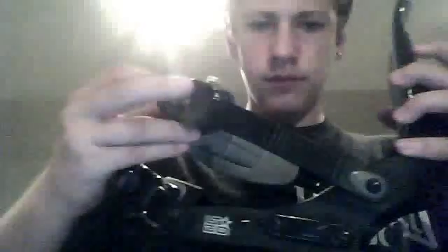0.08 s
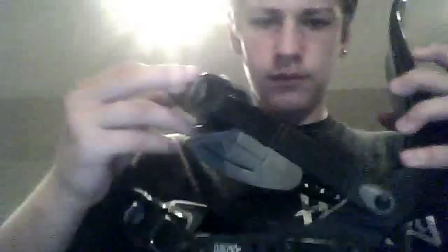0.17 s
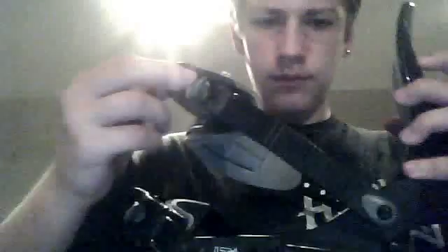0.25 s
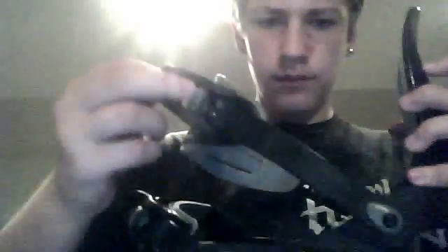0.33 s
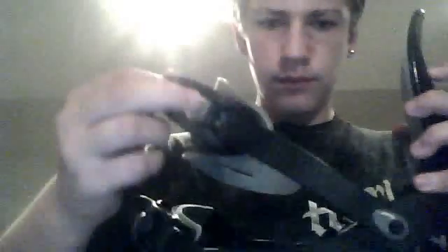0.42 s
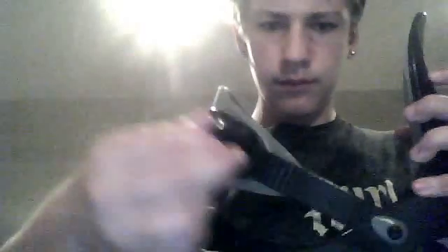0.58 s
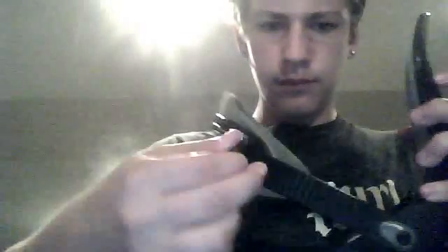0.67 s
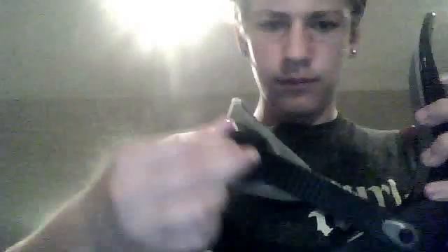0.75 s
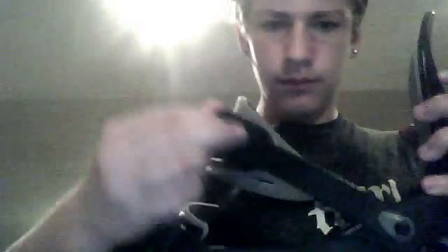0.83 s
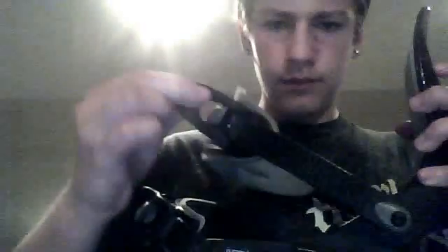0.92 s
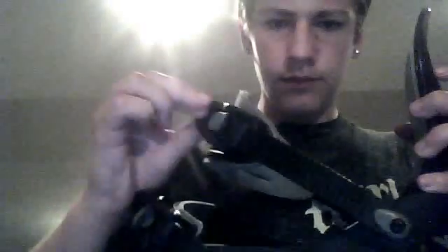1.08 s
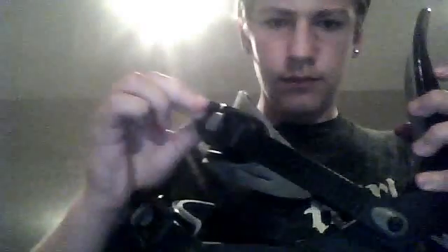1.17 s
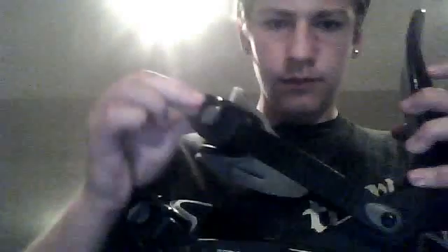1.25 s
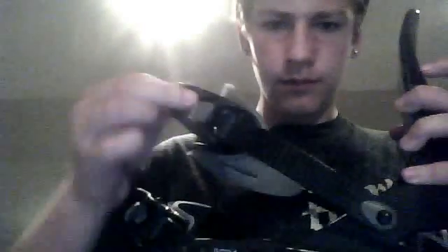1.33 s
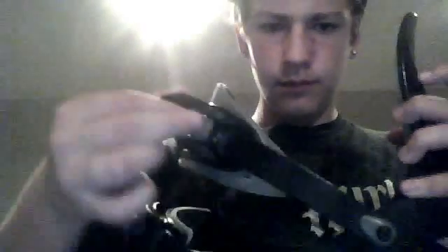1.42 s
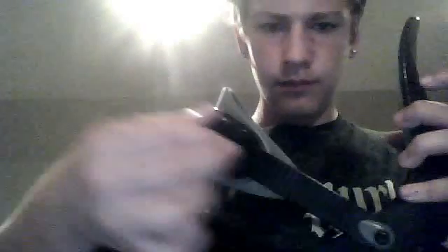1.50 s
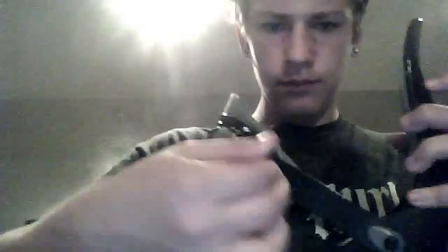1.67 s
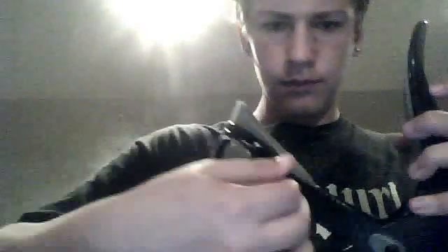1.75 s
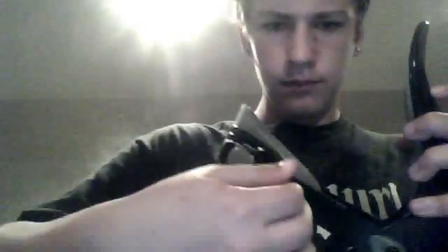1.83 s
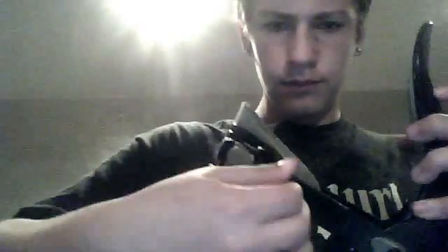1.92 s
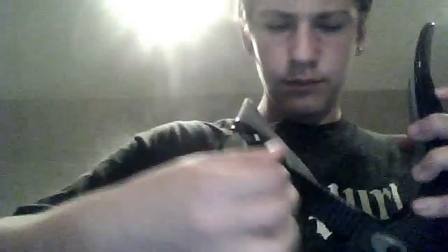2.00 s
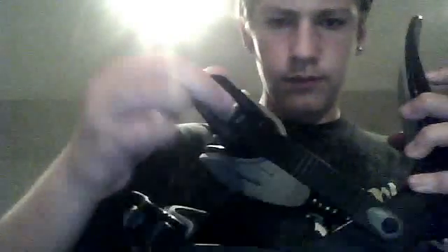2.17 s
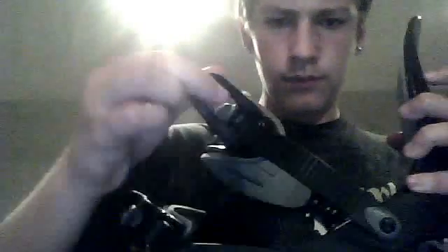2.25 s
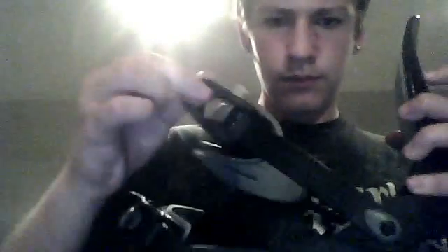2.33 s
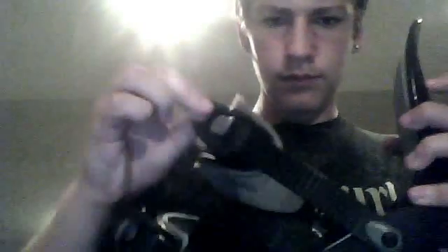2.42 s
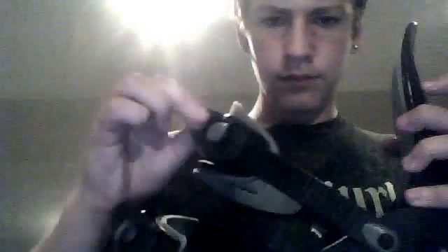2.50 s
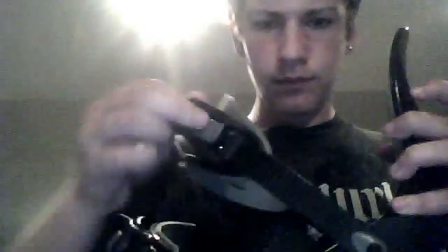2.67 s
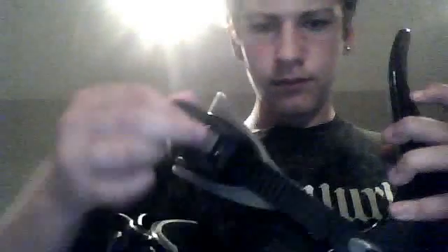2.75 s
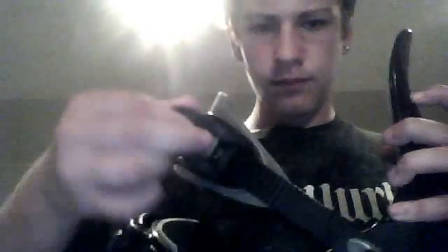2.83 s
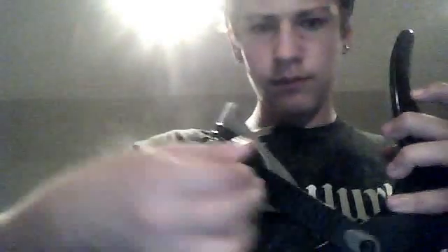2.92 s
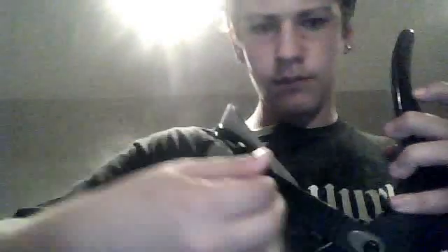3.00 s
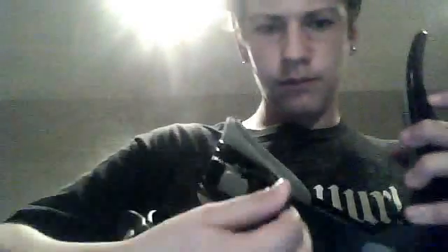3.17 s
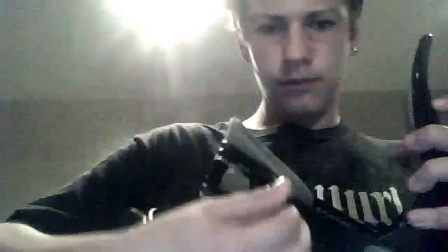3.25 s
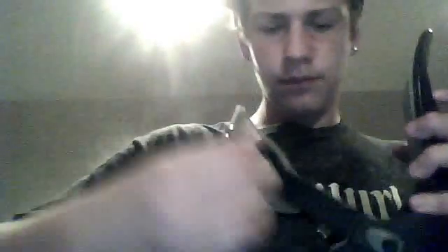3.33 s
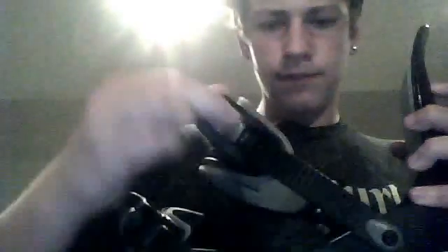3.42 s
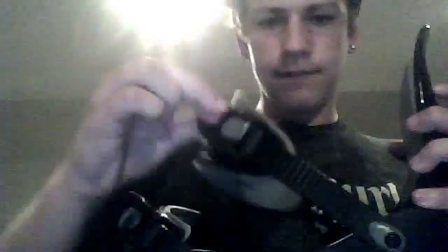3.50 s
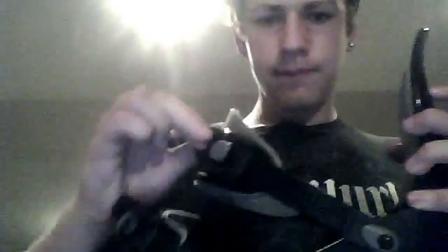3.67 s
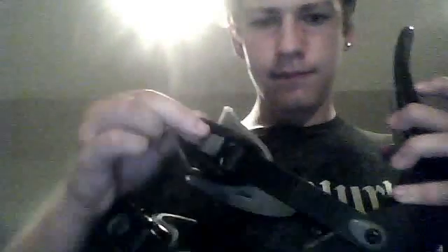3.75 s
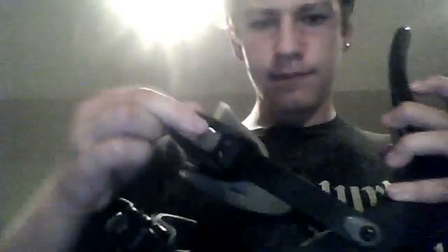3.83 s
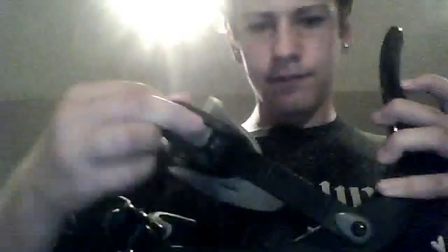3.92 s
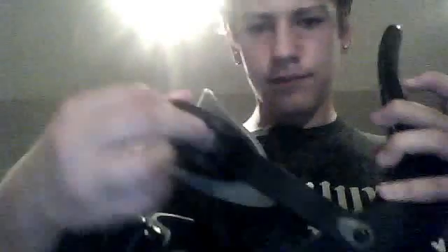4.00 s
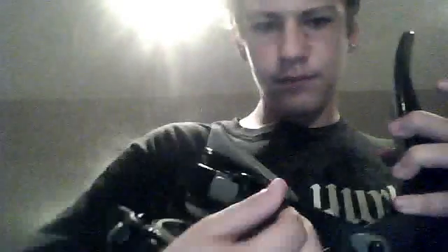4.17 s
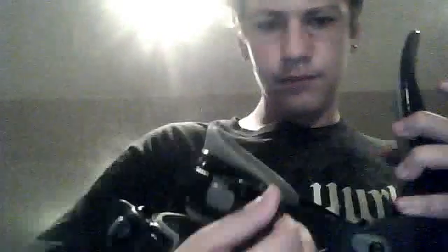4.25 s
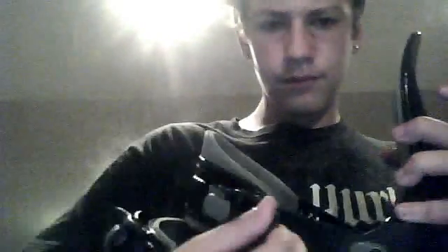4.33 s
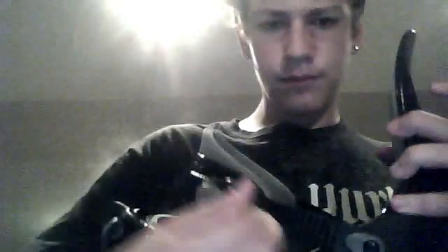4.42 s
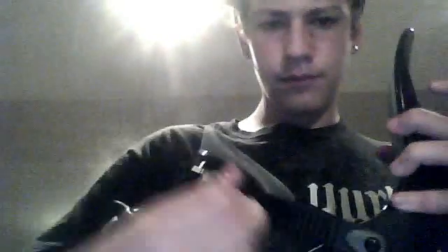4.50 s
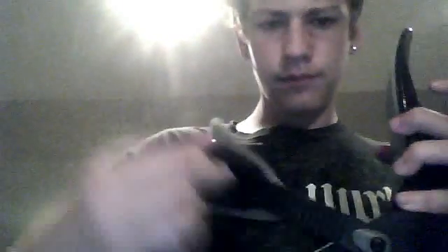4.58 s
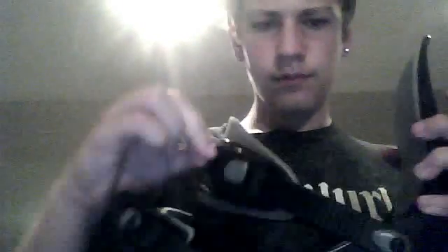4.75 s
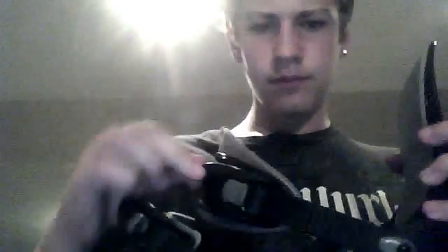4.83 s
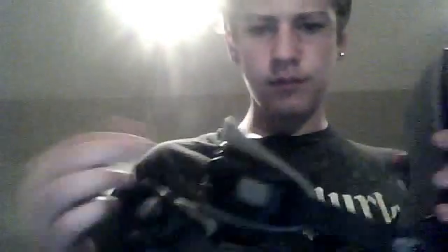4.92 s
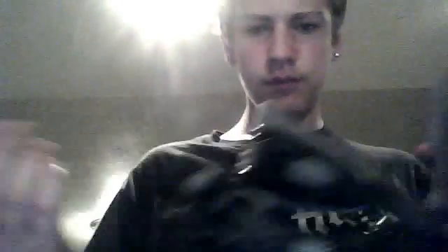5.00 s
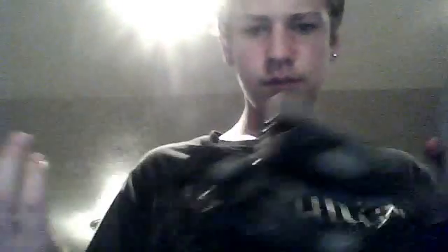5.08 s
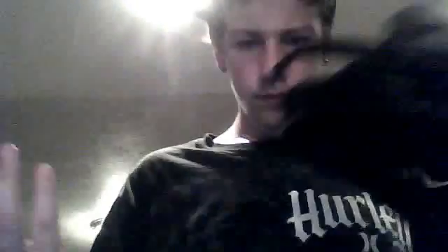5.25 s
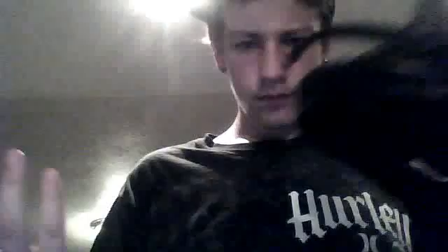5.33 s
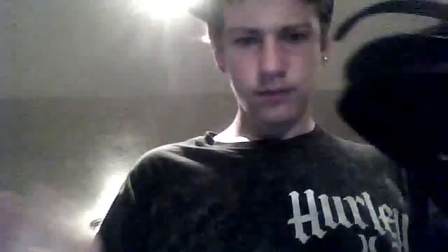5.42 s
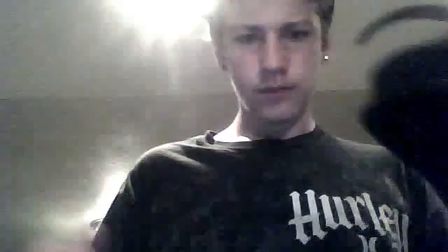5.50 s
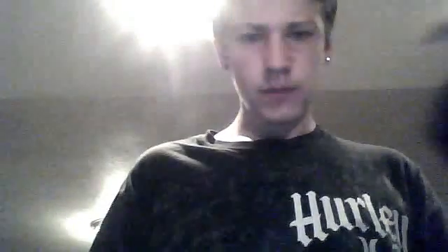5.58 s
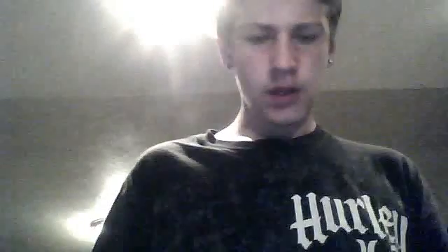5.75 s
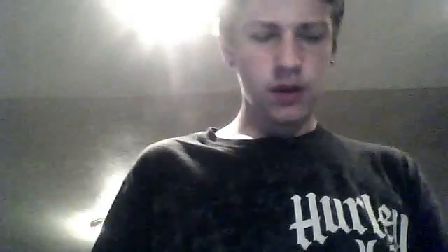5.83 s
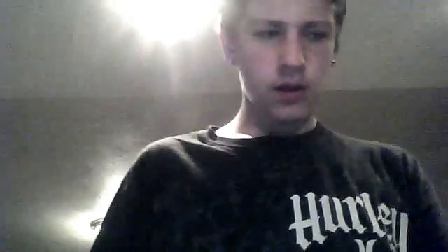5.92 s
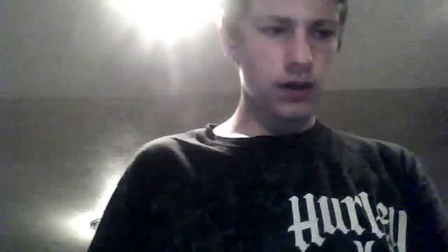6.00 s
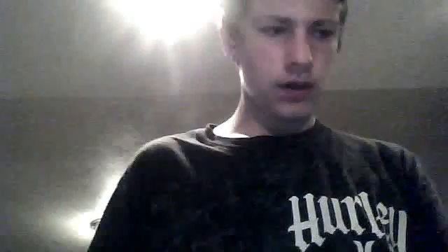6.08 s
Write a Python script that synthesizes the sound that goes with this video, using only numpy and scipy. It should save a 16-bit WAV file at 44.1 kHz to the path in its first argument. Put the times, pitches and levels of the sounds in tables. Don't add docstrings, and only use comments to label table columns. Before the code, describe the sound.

Over constant low motor hum and soft fan hiss, sharp plastic clicks snap in quick pairs, the first the loudest, then a duller single click, more pairs, and small rattling knocks as a lever lands on its stop. Faint ticks fill the gaps. Everything is close, dry and slightly grainy, with dulled treble and a short small-room tail; a muffled thump comes last.

```python
import sys
import numpy as np
from scipy import signal
from scipy.fft import rfft, irfft, next_fast_len
from scipy.io import wavfile
from scipy.ndimage import uniform_filter1d, map_coordinates

SR = 44100
rng = np.random.default_rng(int(sys.argv[2]) if len(sys.argv) > 2 else 0)


def persist_wave(psi):
    counts = np.round(np.clip(psi, -1, 1) * 32767).astype(np.int16)
    wavfile.write(sys.argv[1], SR, np.atleast_2d(counts).T)


def volts(x):
    e = np.asarray(x, float) / 20
    return 10 ** e


N = 271788

# start in seconds, ping peak in
# dB, ping in Hz, shell ring in dB over the ping, bright crack in dB over the ping.
SNAPS = [
    (0.6284, -9.5, 4000, -15.5, -4),
    (0.6955, -14.5, 4280, -7, 5),
    (1.021, -21.5, 5880, -3.5, -7),
    (1.5733, -12.5, 3950, -9.5, 3),
    (1.631, -13, 3210, -7, 3.5),
    (2.9191, -12, 3130, -8, 2.5),
    (2.9742, -18.5, 3941, 1, -1),
    (4.0985, -13, 3950, -8.5, 3.5),
    (4.1307, -17, 3110, -1, -0.5),
]
# start in seconds, ping peak in dB, ping in Hz.
REBOUNDS = [
    (0.6359, -31, 4360),
    (0.713, -28, 4500),
    (1.03, -22, 4900),
    (2.9895, -28, 5020),
    (4.106, -22, 4140),
]
# shell ring, strap clack, bright crack, each in dB over the ping.
REBOUND_COLOUR_DB = (-25, -18.5, -11)
# start in seconds, ping peak in dB, then shell ring,
# strap clack, bright crack in dB over the ping.
KNOCKS = [(1.0227, -25.5, 12.5, -4, -1), (1.0615, -34, 8, 5, -6), (2.3868, -25.5, 2.5, 2, 1.5),
          (3.4458, -34, 2, 1, -30), (3.5294, -26, -3.5, -4.5, -8), (3.5379, -39, 5, -6, -8),
          (3.551, -47, 11.5, 2, -15), (4.6272, -36.5, 6, 5.5, -15), (4.6785, -19, 1, -2, -0.5),
          (4.6884, -26, -7, -19, -10), (4.7233, -32.5, -8, -1, -10), (4.7263, -35, 0, 3, -1),
          (6.1457, -29.5, -3, -0.5, -27)]
# start in seconds, shell ring in dB.
TICKS = [(1.3337, -40.5), (2.6964, -37.5), (2.7466, -40), (2.8498, -37.5), (3.3634, -39.5), (3.4116, -40),
         (3.8254, -38.5), (3.8875, -37), (4.5868, -37), (4.8434, -39), (4.9488, -38.5), (5.7098, -47)]
# start in seconds, body in Hz, body peak in dB, low thud in dB over the body.
THUDS = [
    (1.0215, 667, -22, -2.5),
    (2.3868, 655, -26, 0.5),
    (3.5308, 690, -25.5, -4),
    (4.6788, 706, -18.5, -37),
    (4.724, 650, -25, -17),
]
# start in seconds, Hz, peak in dB, decay in cycles.
BUMPS = [(.63, 346, -38, 6.1), (.70, 470, -34, 6.9), (1.95, 460, -36, 8.6), (2.03, 450, -39.5, 6.8),
         (4.1, 165.3, -35.5, 2.6), (4.68, 1410, -21.5, 3.5), (4.88, 500, -36.5, 4.5), (6.085, 13, -28, 1.5),
         (6.144, 1450, -26.5, 3.2), (6.154, 340, -30.5, 5.8), (6.159, 64, -18.5, 1.3)]
# centre in Hz, width in Hz, level in dB.
PAWL_MODES = [(3740, 1900, -7.5), (5150, 1000, -1)]
STRAP_MODES = [(1366, 500, -6.5), (2770, 550, -3)]
TOOTH_MODES = [(6810, 680, -1), (7840, 490, 1), (8800, 750, -6)]
# Hz, time to fall 60 dB in seconds.
ROOM_T60 = [(300, 0.14), (900, 0.23), (2000, 0.24), (4000, 0.39), (7000, 0.3), (10000, 0.39)]
# Hz, level in dB.
MOTOR_TONES = [(89.85, -33), (61.3, -49), (120.4, -62)]
# time in seconds, shaft in Hz.
FAN_SHAFT = [(0, 66.84), (1, 66.22), (2.3, 66.67), (3.3, 66.77), (4.4, 67.46), (5.1, 66.55), (5.6, 66.06),
             (6.16, 65.8)]
# multiple of shaft speed, level in dB.
FAN_LINES = [(4, -57), (7, -63.5), (8, -66.5), (11, -64.5), (12, -52.5), (13, -64.5), (15, -65.5),
             (16, -68.5), (20, -68)]
# Hz, density in dB per Hz.
RUMBLE = [(15, -3), (27, 5.5), (43, -5), (62, 1.5), (110, -2), (200, -14), (400, -40), (1000, -120)]
# Hz, density in dB per Hz.
HISS = [(60, -28), (200, -10), (450, -11), (1100, -15.5), (2500, -20), (5500, -24.5), (7000, -25),
        (9500, -29)]
# Hz, gain in dB.
CAPTURE_BAND = [(20, -1.5), (9250, -2), (9500, -5.5), (10550, -3), (10800, -35), (11025, -60), (22050, -95)]
# Hz, gain in dB.
MIRROR_LEAK = [(11000, -3), (11500, -10), (12000, -31), (12600, -38), (14000, -90)]

LEVER_HZ = 3900
TICK_RING_DB, TICK_CLACK_DB, TICK_BRIGHT_DB = 12.5, 3, -12
BODY_CYCLES, THUD_HZ, THUD_CYCLES = 3, 496, 2.1
AIR_DB = -45.5
WHINE_HZ, WHINE_WIDTH_HZ, WHINE_DB = 6450, 120, -20.5


def unit(x):
    return x / np.sqrt(np.mean(x ** 2) + 1e-20)


def along(points, hz):
    f, v = np.transpose(points)
    return np.interp(np.log(hz + 1), np.log(f + 1), v)


def wobble(rate_hz):
    knots = rng.standard_normal(int(N * rate_hz / SR) + 4)
    return map_coordinates(knots, [np.arange(N) * rate_hz / SR])


def filtered(x, response):
    m = next_fast_len(len(x) + 8192)
    return irfft(rfft(x, m) * response(np.fft.rfftfreq(m, 1 / SR)), m)[:len(x)]


def resonant(x, modes):
    def response(f):
        total = 0
        for k, (centre, width, db) in enumerate(modes):
            damping = 1j * f * width
            total = total + (-1) ** k * volts(db) * damping / (centre * centre - f * f + damping)
        return total

    y = filtered(x, response)
    return y / np.abs(y).max()


def walls(x):
    hz, t, z = signal.stft(rng.standard_normal(SR // 3), SR, nperseg=256)
    decay = volts(-60 * t / along(ROOM_T60, hz)[:, None])
    tail = signal.istft(z * decay, SR, nperseg=256)[1]
    return signal.fftconvolve(np.pad(x, (260, 0)), tail / np.linalg.norm(tail))


def hits(table, crack_s, shell_hz, swell_s, gain_db, shell_db, wet_db, pure_db, lean, spill):
    out = np.zeros(N + SR)
    t = np.arange(SR // 16) / SR
    swell = (t / swell_s) ** 2 * np.exp(-t / swell_s)
    modes = np.sin(2 * np.pi * shell_hz * t) - 0.12 * np.sin(2 * np.pi * 1.18 * shell_hz * t)
    shell = swell / swell.max() * modes
    edge = 1. * (t == 0)
    grit = volts(-60 * t / crack_s) + volts(-60 * t / 0.09) * np.array([[.16], [.16], [.08]])

    def crack(blow, ping_hz, width_hz, ping_db, clack_db):
        pawl_part = resonant(blow[0], PAWL_MODES + [(ping_hz, width_hz, ping_db)])
        return pawl_part + volts(clack_db) * resonant(blow[1], STRAP_MODES)

    for s, db, ping_hz, ring_db, clack_db, bright_db in table:
        start = round(s * SR)
        ring = volts(ring_db + shell_db) * shell
        rattle = rng.standard_normal((3, len(t))) * grit
        rattle[:, 0] = 3.28

        wide = crack([edge, edge], ping_hz, 1030, -7, clack_db - 0.5)
        bright = volts(bright_db) * resonant(edge, TOOTH_MODES)
        wet = walls(wide + 0.32 * bright + 0.41 * ring)

        direct = crack(rattle, ping_hz, 460, pure_db - lean * bright_db, clack_db)
        direct = direct + volts(bright_db) * resonant(rattle[2], TOOTH_MODES) + ring
        out[start:][:len(t)] += volts(db + gain_db) * direct
        out[start:][:len(wet)] += volts(db + gain_db + wet_db + spill * clack_db) * wet
    return out[:N]


def pawl():
    rows = [(s, db, hz, ring_db, 0.54 * ring_db, bright_db) for s, db, hz, ring_db, bright_db in SNAPS]
    rows += [(*row, *REBOUND_COLOUR_DB) for row in REBOUNDS]
    return hits(sorted(rows), crack_s=0.0049, shell_hz=862, swell_s=0.0017, gain_db=4.0, shell_db=-1.0,
                wet_db=-3.0, pure_db=21, lean=2.8, spill=0.3)


def lever():
    rows = [(s, db, LEVER_HZ, *colour_db) for s, db, *colour_db in KNOCKS]
    rows += [(s, db - TICK_RING_DB, LEVER_HZ, TICK_RING_DB, TICK_CLACK_DB, TICK_BRIGHT_DB) for s, db in TICKS]
    return hits(sorted(rows), crack_s=0.011, shell_hz=857, swell_s=0.0013, gain_db=2.5, shell_db=-0.5,
                wet_db=-3, pure_db=19, lean=.05, spill=.05)


def bumps():
    t = np.arange(N) / SR
    rows = BUMPS + [(s, hz, db, BODY_CYCLES) for s, hz, db, _ in THUDS]
    rows = rows + [(s, THUD_HZ, db + low_db, THUD_CYCLES) for s, _, db, low_db in THUDS]
    out = np.zeros(N)
    for s, hz, db, decay_cycles in rows:
        turns = np.clip(t - s, 0, None) * hz
        out -= volts(db) * np.sin(2 * np.pi * turns) * np.exp(-turns / decay_cycles)
    return out


def motor():
    t = np.arange(N) / SR
    out = np.zeros(N)
    for hz, db in MOTOR_TONES:
        out += volts(db + 5.0 + 0.5 * wobble(7.5)) * np.sin(2 * np.pi * (hz * t + rng.random()))
    return out


def fan():
    shaft_hz = np.interp(np.arange(N) / SR, *np.transpose(FAN_SHAFT))
    turns = np.cumsum(shaft_hz * (1 + 0.0023 * wobble(6))) / SR
    out = np.zeros(N)
    for k, db in FAN_LINES:
        out += volts(db + 5.5 + 1.8 * wobble(13)) * np.sin(2 * np.pi * (round(k) * turns + rng.random()))
    return out


def air():
    z = signal.stft(rng.standard_normal(N), nperseg=512)[2]
    patches = uniform_filter1d(rng.standard_normal(z.shape), size=6, axis=0)
    patches = uniform_filter1d(patches, size=10, axis=1)
    noise = signal.istft(z * volts(.7 * unit(patches)), nperseg=512)[1][:N]

    def colour(hz):
        whine = volts(WHINE_DB) * np.exp(-((hz - WHINE_HZ) / WHINE_WIDTH_HZ) ** 2) / 2
        return np.hypot(volts(along(RUMBLE, hz)), volts(along(HISS, hz)) + whine)

    return volts(AIR_DB) * unit(filtered(noise, colour))


def scene():
    return (pawl() + lever() + bumps() + motor() + fan() + air())[None]


def block_noise(x, noise_db, top_hz):
    lead = 478
    win = np.sin(np.pi * (np.arange(512) + .5) / 512)
    hz, _, z = signal.stft(np.pad(x, (lead, 1024)), SR, win, nperseg=512)
    z, hz = z[:, :z.shape[1] // 2 * 2], hz[:, None]
    power = uniform_filter1d(np.abs(z) ** 2, size=5, axis=0)
    pairs = np.repeat((power[:, ::2] + power[:, 1::2]) / 2, 2, axis=1)
    grain = np.sqrt(np.abs(pairs)) * np.exp(2j * np.pi * rng.random(pairs.shape)) * (hz > 600)
    noisy = np.where(hz > top_hz, grain, z + volts(noise_db) * grain)
    return signal.istft(noisy, SR, win, nperseg=512)[1][lead:lead + N]


def roll_off(x):
    return signal.sosfilt(signal.butter(12, 12830, fs=SR, output="sos"), x)


def record(dry):
    x = block_noise(dry[0], noise_db=-8.5, top_hz=9620)
    x = filtered(x, lambda hz: volts(along(CAPTURE_BAND, hz)))
    mirror = x * (-1) ** np.arange(N)
    x = x + filtered(mirror, lambda hz: volts(along(MIRROR_LEAK, hz)))
    return roll_off(x[None])


dry = scene()
out = record(dry)
persist_wave(out)
```